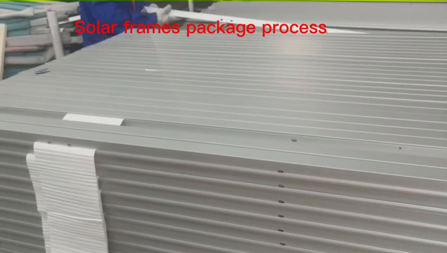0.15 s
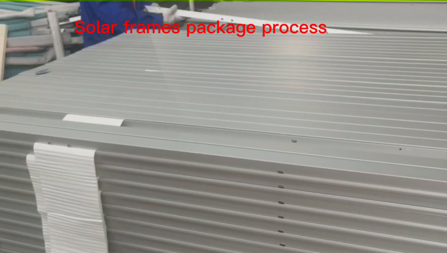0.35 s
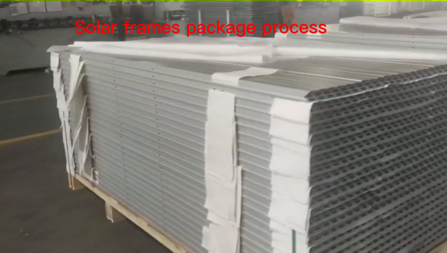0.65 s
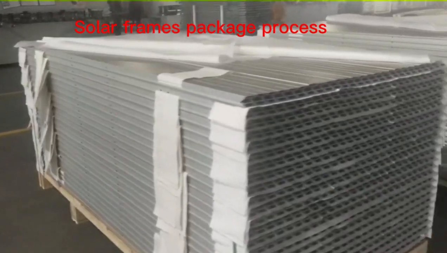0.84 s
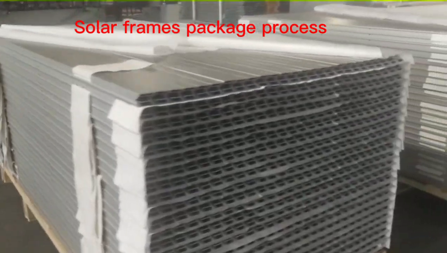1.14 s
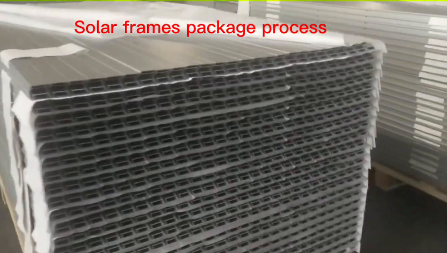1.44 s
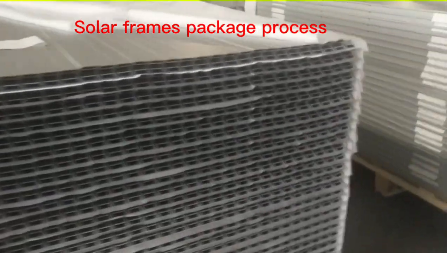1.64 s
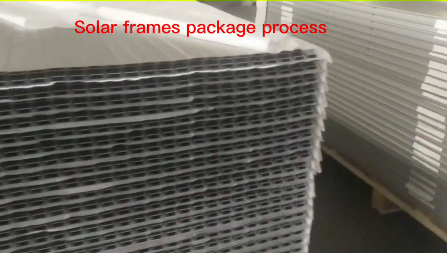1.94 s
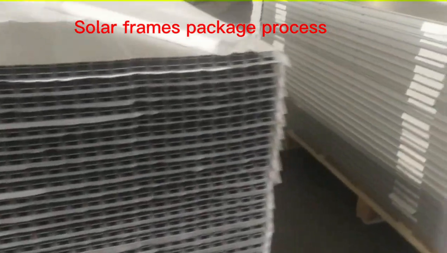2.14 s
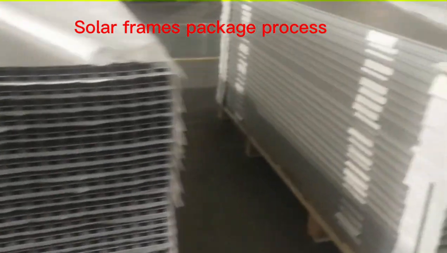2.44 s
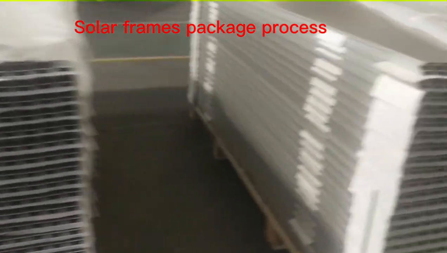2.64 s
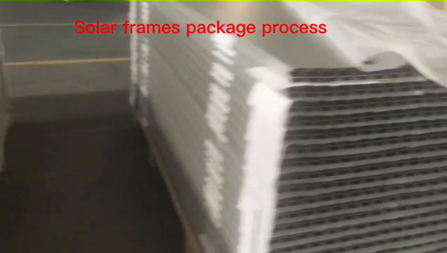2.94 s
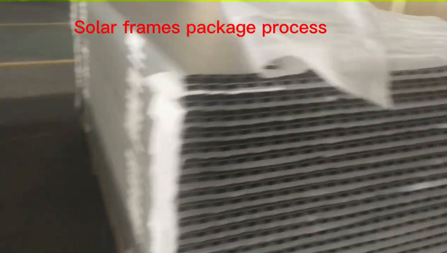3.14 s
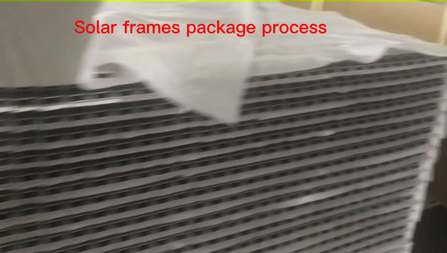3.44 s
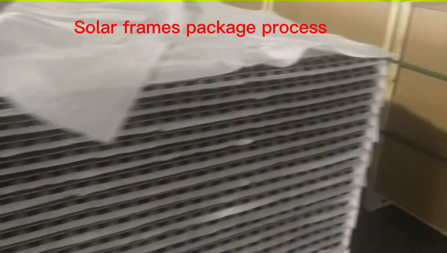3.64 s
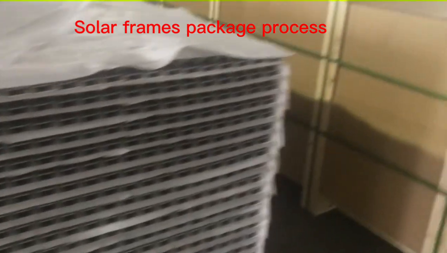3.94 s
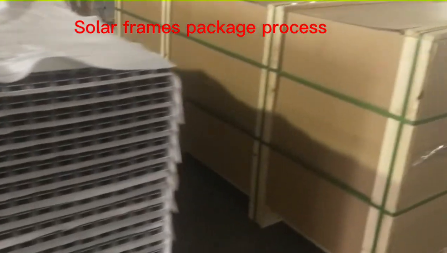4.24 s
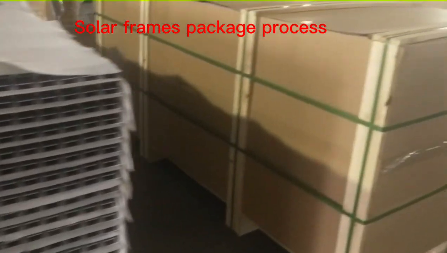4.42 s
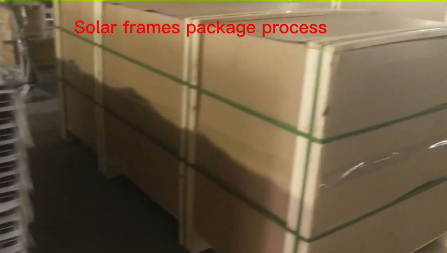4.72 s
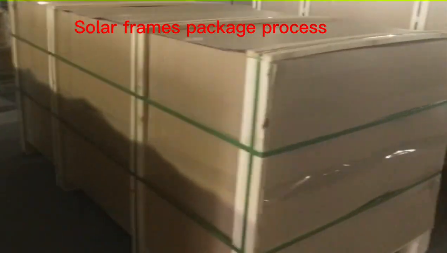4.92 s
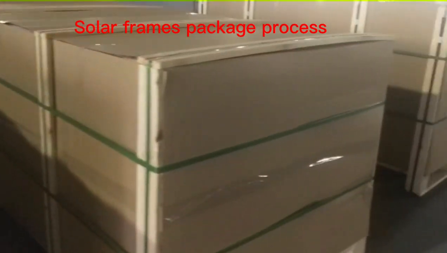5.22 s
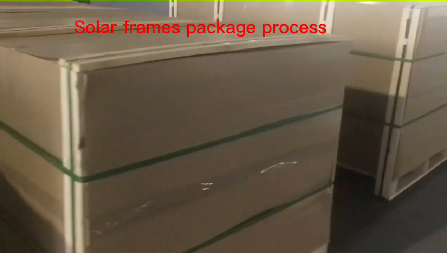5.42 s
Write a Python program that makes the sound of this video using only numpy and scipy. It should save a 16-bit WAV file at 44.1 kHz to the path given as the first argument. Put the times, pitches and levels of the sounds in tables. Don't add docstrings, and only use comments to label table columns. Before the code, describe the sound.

In a large reverberant factory hall, distant machines make a steady roar with hums and a thin whine. A high saw squeal is already sounding, then everything stops dead for a fifth of a second. The hall fades back in; long squeals slide downward, a dragged load buzzes briefly, and metal bars clatter close to the end. Hand-held microphone, slightly dull treble.

```python
import sys
import numpy as np
from scipy import signal
from scipy.io import wavfile
from scipy.ndimage import uniform_filter1d

SR = 44100
rng = np.random.default_rng(int(sys.argv[2]) if len(sys.argv) > 2 else 0)


def volts_from_decibels(level):
    exponent = np.asarray(level, float) / 20
    return 10 ** exponent


def to_wav(sig):
    pcm = np.clip(np.atleast_2d(sig), -1, 1) * 32767
    pcm = np.round(pcm).astype(np.int16)
    wavfile.write(sys.argv[1], SR, pcm.T)


N = 245813
GAP_START_S, GAP_END_S = .3017, .5032


def evened(x):
    return x / np.sqrt(np.mean(x ** 2) + 1e-20)


def read(points, hz):
    f, value = np.transpose(points)
    return np.interp(np.log(hz + 1), np.log(f + 1), value)


def add(mix, start_s, sound):
    part = mix[round(start_s * SR):][:len(sound)]
    part += sound[:len(part)]


def drift(size, hz):
    lowpass = signal.butter(2, hz, fs=SR, output="sos")
    settle = 9000
    return evened(signal.sosfilt(lowpass, rng.standard_normal(size + settle))[settle:])


def fuzzy(size, hz, width_hz):
    phase = 2 * np.pi * hz * np.arange(size) / SR
    in_phase = drift(size, width_hz / 2) * np.cos(phase)
    quadrature = drift(size, width_hz / 2) * np.sin(phase)
    return evened(in_phase + quadrature)


def swells(rows, t, lift):
    mid_s, length_s, db = np.transpose(rows)[:, :, None]
    humps = np.cos(np.pi * np.clip((t - mid_s) / length_s, -.5, .5)) ** 2
    return np.sum(lift(db) * humps, axis=0)


def hall(x, t60_s, direct_db):
    t = np.arange(2 * SR) / SR
    tail = rng.standard_normal(len(t)) * volts_from_decibels(-60 * t / t60_s)
    tail /= np.linalg.norm(tail)
    return volts_from_decibels(direct_db) * x + signal.fftconvolve(x, tail)[:len(x)]


# start t/s, swell/s, hold/s, level/dB, fade/(dB/s)
CUTS = [
    (-.4, 0.26, 0.31, -19, 32.5),
    (0.069, .1, 0.32, -20, 32.5),
    (0.349, 0.27, .15, -26.5, 33),
    (.51, 0.085, .12, -24, 34),
    (1.26, .1, 0.81, -25.5, 38),
    (3.0, 0.093, .17, -15, 31),
    (1.277, .06, 0.15, -35.5, 62),
    (1.818, .06, 0.18, -30, 35),
]
# entry f/Hz, loaded f/Hz, settling/s, wobble/Hz, bite/s
BLADES = [(5990, 5780, .4, 45, .8), (5710, 5570, .1, 35, .3), (4195, 4225, 0.201, 35, .65),
          (4180, 4465, .07, 41, .55), (6013, 5650, .25, 60, 1.14), (6040, 5640, .09, 65, 0.734),
          (5080, 5140, .15, 110, .25), (5100, 5140, .08, 45, .4)]
THROB_DB = [1.2, 1.2, 1, 1, 1, 2.6, .6, .6]
# multiple of pitch, level/dB, roughness/0-1
HIGH_PARTIALS = [(.5, -6, 0.47), (1, 5.5, 0.19), (1.5, -20, 0.6), (2, -28.5, 0.3)]
LOW_PARTIALS = [(2 / 3, -15, 0.72), (1, 0, 0.52), (2, -23, 0.6)]
LONG_PARTIALS = [(.5, -1, 0.52), (1, 5.5, 0.33), (1.5, -14, 0.19), (2, -33, .1)]
LOUD_PARTIALS = [(.5, -16.5, 0.72), (1, 8, 0.29), (1.5, -28, 0.54), (2, -38, 0.088)]
FAR_PARTIALS = [(1, 0, 0.42)]
CUT_PARTIALS = [HIGH_PARTIALS] * 2 + [LOW_PARTIALS] * 2 + [LONG_PARTIALS, LOUD_PARTIALS] + [FAR_PARTIALS] * 2
SHAFT_HZ, RUNOUT_SHARE = 54, .6
THROB_HZ, THROB_AT_S, THROB_GROWS_S = 18.3, 3.41, .36
QUIET_DB = -48


def saw_cut(cut, blade, partials, throb_db):
    start_s, swell_s, hold_s, cut_db, fade_db_per_s = cut
    entry_hz, load_hz, settle_s, wobble_hz, bite_s = blade
    t = np.arange(0, swell_s + hold_s + (cut_db - QUIET_DB) / fade_db_per_s, 1 / SR)
    scene_s = t + start_s

    hz = load_hz + (entry_hz - load_hz) * np.exp(-t / settle_s)
    runout = np.sqrt(2) * np.sin(2 * np.pi * SHAFT_HZ * t)
    sway = RUNOUT_SHARE * runout + (1 - RUNOUT_SHARE) * drift(len(t), 41.6)
    turns = np.cumsum(hz + wobble_hz * sway) / SR

    biting = np.clip(t / 0.11, .15, 1) ** 2
    biting *= np.clip((bite_s - t) / 0.14, 0, 1)
    chatter = drift(len(t), 60)
    teeth = biting * sum(volts_from_decibels(db) * (1 - rough + rough * chatter) * np.sin(2 * np.pi * multiple * turns)
                         for multiple, db, rough in partials)
    sung = hall(teeth, t60_s=1.7, direct_db=-5)
    sung /= np.sqrt(uniform_filter1d(sung ** 2, size=4000, mode="reflect"))

    fade_db = fade_db_per_s * np.maximum(t - swell_s - hold_s, 0)
    level = np.minimum(t / swell_s, 1) ** 2 * volts_from_decibels(cut_db - fade_db)
    thump = np.cos(2 * np.pi * THROB_HZ * (scene_s - THROB_AT_S))
    level *= volts_from_decibels(throb_db * np.minimum(t / THROB_GROWS_S, 1) ** 2 * thump)
    heard = (scene_s >= 0) & ((scene_s < GAP_END_S) | (start_s > GAP_START_S))
    return max(start_s, 0), (level * sung)[heard]


# t/s, level/dB
BLOWS = [
    (5.429, -15),
    (5.445, -9),
    (5.462, -10.5),
    (5.497, -7.5),
    (5.519, -15),
]
# f/Hz, level/dB, T60/s
BAR_MODES = [(1788, -3.5, 0.11), (1940, -8.5, .1), (2100, -2, 0.067), (2545, -2, 0.09), (2600, -34, .1),
             (2690, -6, 0.089), (2834, -1, 0.06), (4250, -12, .1), (4640, -12.5, 0.087), (5500, -7, 0.045),
             (5830, -2, .04), (6740, -12.5, 0.043)]


def clatter():
    t = np.arange(SR // 4) / SR
    out = np.zeros(SR // 2)
    first_s = BLOWS[0][0]
    band = signal.butter(5, [1300, 7500], "bandpass", fs=SR, output="sos")
    for blow_s, db in BLOWS:
        modes = sum(volts_from_decibels(mode_db - 60 * t / t60_s) * np.sin(2 * np.pi * (hz * t + rng.random()))
                    for hz, mode_db, t60_s in BAR_MODES)
        grit = rng.standard_normal(len(t)) * volts_from_decibels(8.2 * drift(len(t), 150))
        rasp = signal.sosfilt(band, grit) * volts_from_decibels(-7 - 60 * t / 0.29)
        attack = np.minimum(t / 0.0044, 1)
        blow = (modes / abs(modes).max() + rasp / 3) * attack
        add(out, blow_s - first_s, volts_from_decibels(db - 1) * blow)
    return first_s, hall(out, t60_s=.6, direct_db=-2)


# t/s, length/s, level/dB, slip rate f/Hz
DRAG = (1.99, .5, -29.5, 177)
# f/Hz, level/dB
DRAG_BODY = [(800, -23), (1060, -1), (1400, -1), (1950, 4), (2300, -1), (2700, -28)]


def drag():
    start_s, length_s, db, slip_hz = DRAG
    size = round(length_s * SR)
    turns = np.cumsum(slip_hz * (1 + .012 * drift(size, 9.55))) / SR
    comb = sum(volts_from_decibels(read(DRAG_BODY, k * slip_hz)) * np.cos(2 * np.pi * k * turns) for k in range(4, 17))
    buzz = evened(hall(comb, t60_s=.5, direct_db=0.5))
    return start_s, volts_from_decibels(db) * signal.windows.tukey(size, .45) * buzz


# t/s, length/s, f/Hz, width/Hz, level/dB
RINGS = [(2.23, 0.86, 101, 27, -32), (4.95, 0.53, 163, 30, -36), (5.466, 0.07, 9500, 140, -39.5),
         (5, .03, 5300, 200, -28), (5.443, 0.039, 5600, 130, -25), (5.44, 0.052, 1790, 90, -28.5),
         (5.445, 0.073, 2600, 260, -28.5), (.7, .12, 2000, 40, -37.5), (2.609, 0.17, 740, 100, -34),
         (2.63, 0.39, 830, 29, -40), (2.77, 0.17, 2700, 49, -36.5), (3.07, 0.21, 2350, 130, -35.5),
         (4.137, 0.39, 1600, 20, -44), (4.147, 0.29, 1324, 24, -43), (4.393, 0.45, 1262, 89, -38),
         (4.298, 0.42, 2000, 45, -42), (5, 0.13, 2660, 120, -36)]


def ring(start_s, length_s, hz, width_hz, db):
    size = round(length_s * SR)
    return start_s, volts_from_decibels(db) * fuzzy(size, hz, width_hz) * signal.windows.tukey(size, .5)


# mid t/s, width/s, level/dB
WHINE_CRESTS = [(.29, 0.18, -45), (.78, .3, -36.5), (1.07, .2, -29.5), (1.23, 0.12, -30),
                (1.39, 0.13, -31.5), (1.47, .06, -35), (1.58, 0.22, -42), (1.82, 0.36, -29),
                (2.0, 0.47, -29.5), (2.13, 0.055, -32), (2.2, .08, -30), (2.28, .15, -37),
                (2.55, 0.14, -30), (2.71, .1, -27.5), (2.78, 0.11, -31.5), (2.92, 0.19, -40),
                (3.38, .12, -44), (3.12, 0.47, -32.5), (3.75, 0.44, -40), (4.02, 0.35, -37),
                (4.25, 0.35, -32.5), (4.48, .1, -33.5), (4.8, 0.42, -28.5), (5.03, 0.17, -32),
                (5.19, .4, -25.5), (5.36, 0.11, -30), (5.58, 0.17, -30.5)]
WHINE_HZ, WHINE_WANDER_HZ, WHINE_FLICKER_DB, WHINE_FLOOR_DB = 3073, 2, 1.5, -49


def whine():
    t = np.arange(N) / SR
    turns = np.cumsum(WHINE_HZ + WHINE_WANDER_HZ * drift(N, 4.35)) / SR
    tone = np.sqrt(2) * np.sin(2 * np.pi * turns) * volts_from_decibels(WHINE_FLICKER_DB * drift(N, 12))
    return (volts_from_decibels(WHINE_FLOOR_DB) + swells(WHINE_CRESTS, t, volts_from_decibels)) * tone


# mid t/s, width/s, level/dB
HUM_CRESTS = [(.25, 0.43, -56.5), (.8, 0.29, -42), (1.25, 0.76, -40), (1.65, 0.78, -38.5),
              (1.98, 0.38, -48), (2.38, 0.74, -40.5), (2.64, 0.06, -42), (2.9, 0.75, -39.5),
              (3.35, .5, -51), (3.85, 0.61, -47), (4.33, 0.74, -38.5), (4.75, 0.4, -39), (5.3, 0.98, -41)]
# f/Hz, width/Hz, level over main hum/dB
SIDE_HUMS = [(719, 14, -8.5), (294.5, 16, -2.5)]
HUM_HZ, HUM_WANDER_HZ, HUM_FLOOR_DB = 656, 3, -54


def hums():
    t = np.arange(N) / SR
    turns = np.cumsum(HUM_HZ + HUM_WANDER_HZ * drift(N, 7.86)) / SR
    tone = np.sqrt(2) * np.sin(2 * np.pi * turns)
    tone += sum(volts_from_decibels(over_db) * fuzzy(N, hz, width_hz) for hz, width_hz, over_db in SIDE_HUMS)
    return (volts_from_decibels(HUM_FLOOR_DB) + swells(HUM_CRESTS, t, volts_from_decibels)) * tone


# t/s, level/dB
HISS = [(0, -33.5), (.22, -38.5), (.5, -35.5), (.7, -36.5), (1.14, -36), (1.6, -36), (2.08, -32.5),
        (2.4, -35), (2.66, -34.5), (3.03, -36.5), (3.15, -34), (3.4, -45), (3.98, -44.5), (4.14, -37),
        (4.5, -34.5), (5.41, -35), (5.45, -27.5), (5.57, -34.5)]
# low f/Hz, high f/Hz
ROAR_BANDS = [(60, 220), (300, 950), (1000, 2600), (6300, 7800)]
# f/Hz, level/dB per Hz
ROAR_TONE = [(15, -46), (25, -35.5), (92, -1.5), (240, -4), (292, -1.5), (554, -7.5), (642, -5.5),
             (883, -9), (1280, -12), (1480, -10.5), (2810, -9), (3020, -7), (3250, -10), (6800, -10.5),
             (8910, -24), (11600, -63), (19600, -120)]
# mid t/s, length/s, level/dB
RUMBLES = [
    (0, 0.57, 6.5),
    (0.63, 0.46, -6.5),
    (1.09, 0.53, 1),
    (2.6, 1.3, 3.5),
    (3.187, .3, -3),
    (3.807, 1.3, 5),
    (5.253, 1.0, 7.5),
]
DRONES = [
    (.62, 0.71, -6),
    (1.2, 0.88, 1.5),
    (2.05, 1, -2),
    (2.85, 0.6, 1),
    (3.2, 0.21, -2),
    (3.85, 0.54, 3.5),
    (5.47, 0.12, -6),
]
RATTLES = [
    (0, 0.38, -4.5),
    (.9, 1, 1.5),
    (2.25, 0.82, 3.5),
    (3.2, 0.27, -3.5),
    (4.2, 0.37, -0.5),
    (5.3, 0.44, -1),
]
RUMBLE_DB, DRONE_DB, RATTLE_DB = 2, 3, 4.5


def roar(patchy_db=1.0, flicker_db=0.66, air_db=-62):
    frames, hz = N // 256 + 5, np.fft.rfftfreq(1024, 1 / SR)
    t = np.arange(frames) * 256 / SR
    hiss_db = np.interp(t, *np.transpose(HISS))
    over_db = [RUMBLE_DB + swells(RUMBLES, t, np.asarray),
               DRONE_DB + swells(DRONES, t, np.asarray),
               RATTLE_DB + swells(RATTLES, t, np.asarray),
               0 * t]
    tone_db = np.maximum(read(ROAR_TONE, hz), air_db)
    power = volts_from_decibels(2 * tone_db)
    share_db = [10 * np.log10(np.sum(power[(hz > lo) & (hz < hi)])) for lo, hi in ROAR_BANDS]
    region_lifts_db = (hiss_db + np.array(over_db)).T - share_db

    knots_hz, knot_region = [150, 350, 800, 1200, 2300, 3600], [0, 1, 1, 2, 2, 3]
    lift_db = np.array([read(list(zip(knots_hz, row[knot_region])), hz) for row in region_lifts_db])

    real, imag, patches = rng.standard_normal((3, frames, len(hz)))
    patches = uniform_filter1d(patches, size=10, axis=0)
    patches = evened(uniform_filter1d(patches, size=10, axis=1))
    flicker = rng.standard_normal((frames, 1))
    level_db = tone_db + lift_db + patchy_db * patches + flicker_db * flicker
    z = (real + 1j * imag) * volts_from_decibels(level_db)
    return volts_from_decibels(1.0) * signal.istft(z.T, nperseg=1024, noverlap=768)[1][:N]


def scene():
    mix = roar() + whine() + hums()
    for cut in zip(CUTS, BLADES, CUT_PARTIALS, THROB_DB):
        add(mix, *saw_cut(*cut))
    for row in RINGS:
        add(mix, *ring(*row))
    add(mix, *drag())
    add(mix, *clatter())
    return mix[None]


def starved_treble(x, from_hz=7700, under_db=-13.5, far_under_db=-21, whim_db=3.5, fleck_db=-92, band=8):
    hz, _, z = signal.stft(x, SR, nperseg=2048, noverlap=1024, window="cosine")
    power, hz = abs(z[:1024]) ** 2, hz[:1024, None]
    bands = power.reshape(-1, band, power.shape[1]).mean(1)
    usual = np.median(power[50:320], axis=0)
    bar_db = np.where(hz[::band] < 10300, under_db, far_under_db)
    bar_db = bar_db + whim_db * rng.standard_normal(bands.shape)
    kept = np.repeat(bands > usual * volts_from_decibels(2 * bar_db), band, axis=0)
    z[:1024] *= kept | (hz < from_hz)

    spare = rng.random(power.shape[1]) ** 3 * np.clip((hz - 11000) / 4500, 0, 1) * (hz < 15500)
    flecks = rng.random(power.shape) < .4 * spare
    z[:1024] += volts_from_decibels(fleck_db) * flecks * rng.standard_normal(power.shape)
    return signal.istft(z, SR, nperseg=2048, noverlap=1024, window="cosine")[1][:N]


def low_pass(x):
    return signal.sosfilt(signal.butter(12, 15500, fs=SR, output="sos"), x)


def record(dry):
    t = np.arange(N) / SR
    highpass = signal.butter(2, 55, "highpass", fs=SR, output="sos")
    heard = starved_treble(signal.sosfilt(highpass, dry[0]))
    fade_in = np.clip(.2 + (t - GAP_END_S) / .16, 0, 1) * (t > GAP_END_S)
    mix = heard * ((t < GAP_START_S) + fade_in)
    return low_pass(mix[None])


dry = scene()
out = record(dry)
to_wav(out)
```